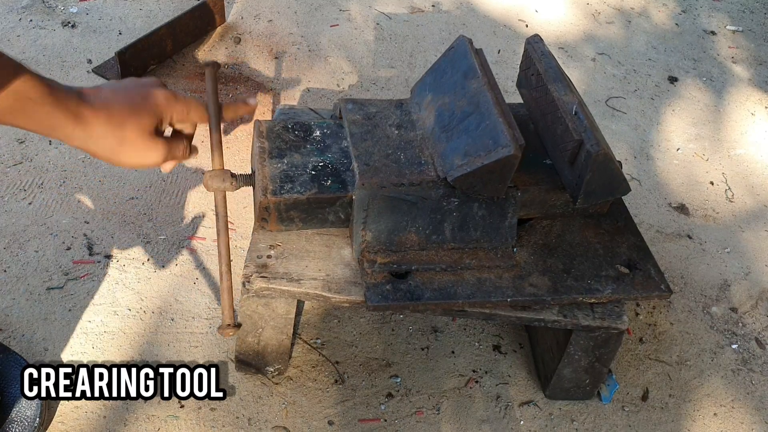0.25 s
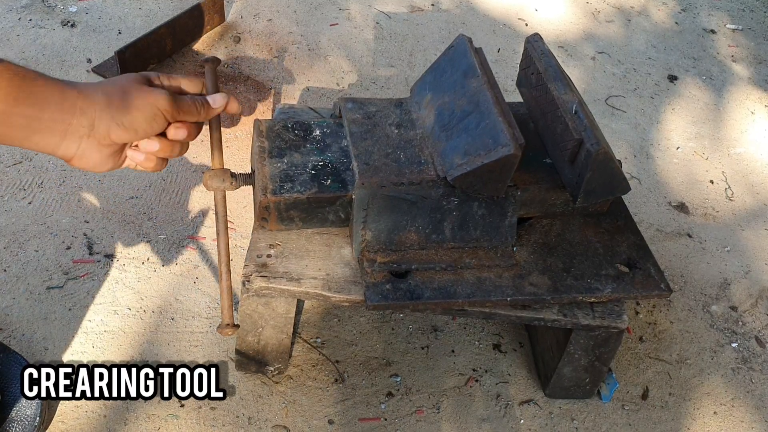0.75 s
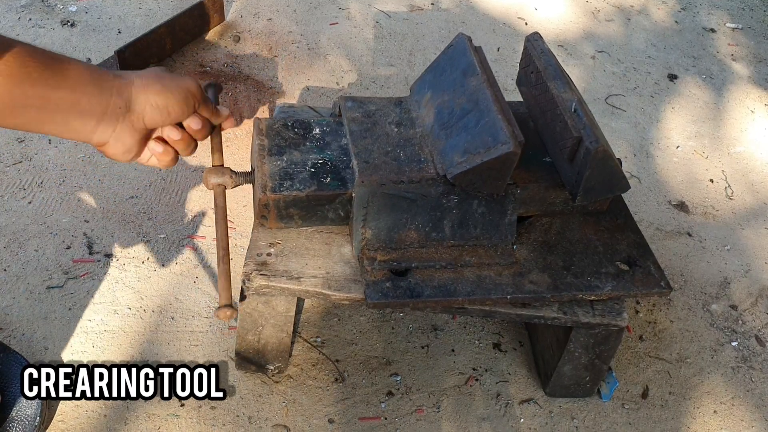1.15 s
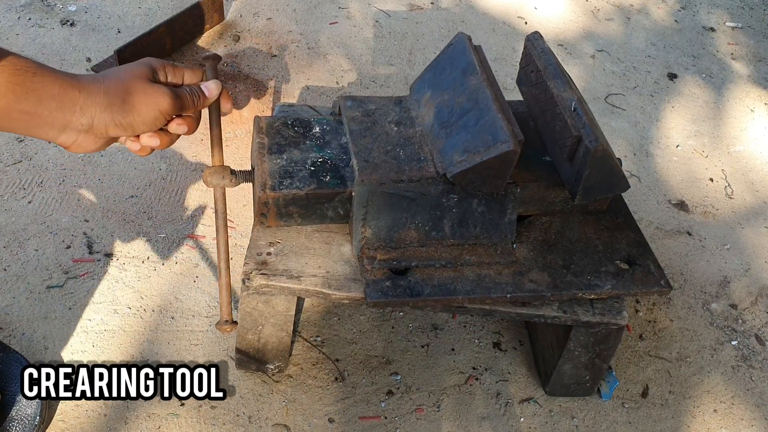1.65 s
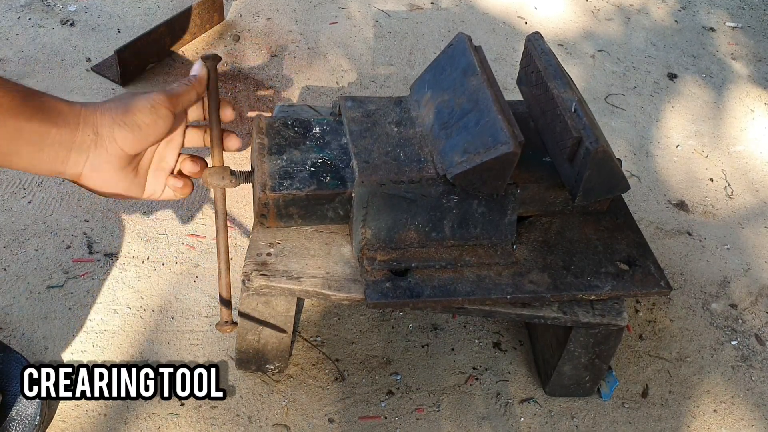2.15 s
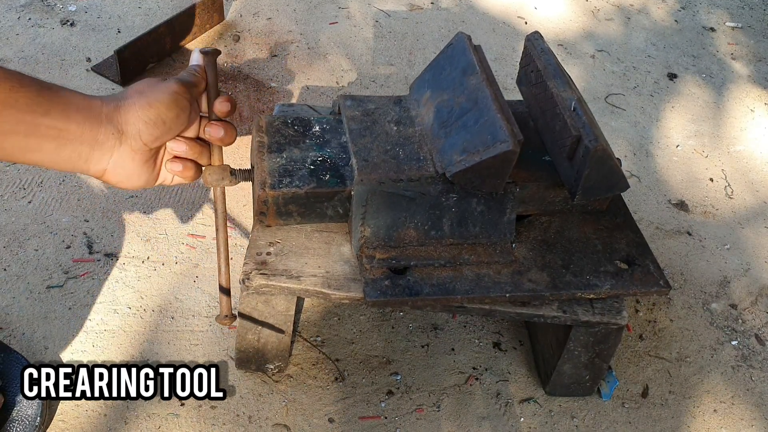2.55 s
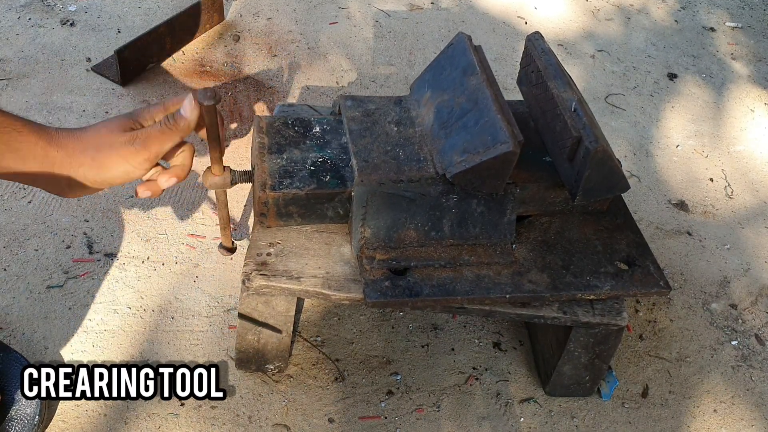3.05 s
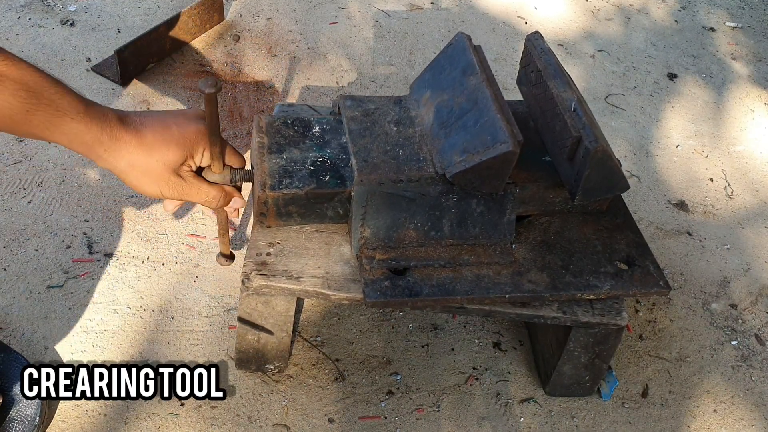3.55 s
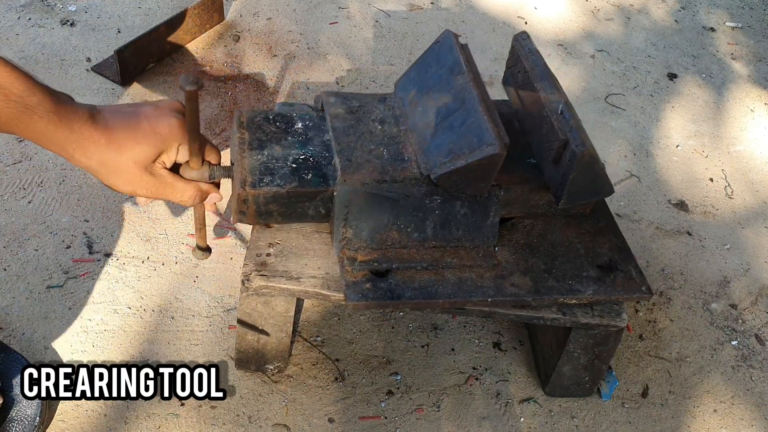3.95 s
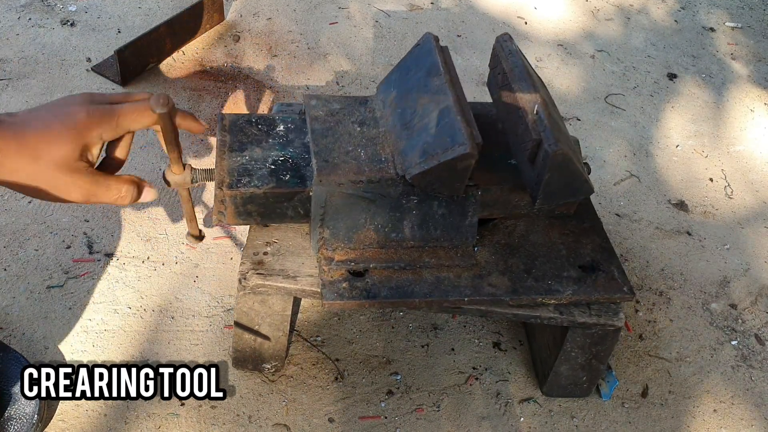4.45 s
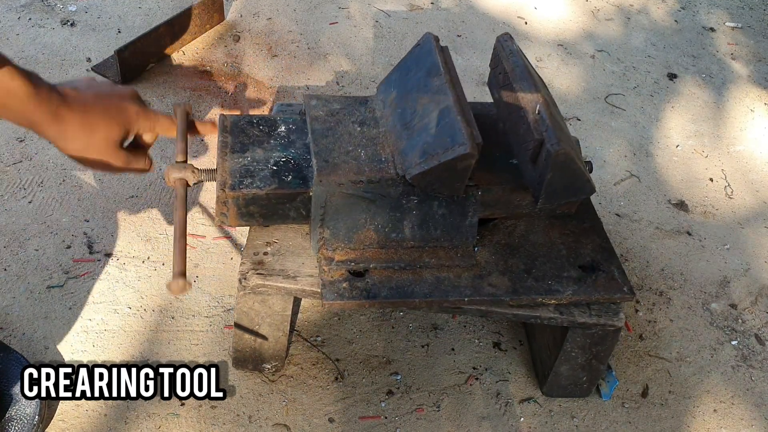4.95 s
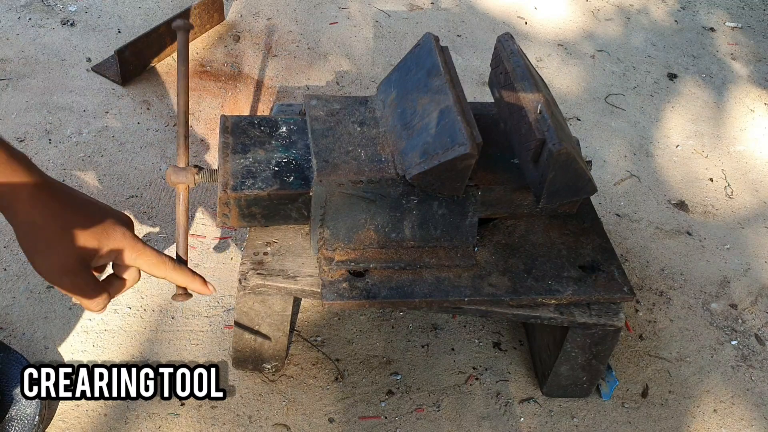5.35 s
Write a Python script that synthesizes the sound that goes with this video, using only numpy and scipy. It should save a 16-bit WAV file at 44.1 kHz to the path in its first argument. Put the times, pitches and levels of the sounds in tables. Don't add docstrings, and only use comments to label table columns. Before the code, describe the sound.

A hand works the loose rod of a heavy metal vise on sandy ground. Hard, quickly damped clanks alternate with gritty scraping and dry skin hiss. Most contacts are faint; one blow near four seconds dominates with rapid rebounds. The microphones are close, slightly nearer on the left, with short yard reflections, low traffic rumble, sparse distant chirps and a thin insect hiss.

```python
import sys
import numpy as np
from scipy import signal
from scipy.fft import rfft, irfft
from scipy.io import wavfile
from scipy.ndimage import uniform_filter1d

SR = 44100
rng = np.random.default_rng(int(sys.argv[2]) if len(sys.argv) > 2 else 0)


def attenuation_scalar(level_db):
    decades = np.asarray(level_db, float) / 20
    return 10 ** decades


def master(y):
    cut = np.clip(np.atleast_2d(y).T, -1, 1)
    pcm = np.round(cut * 32767)
    wavfile.write(sys.argv[1], SR, pcm.astype(np.int16))


N = 246519


def evened(x):
    return x / np.sqrt(np.mean(x ** 2) + 1e-20)


def read(points, hz):
    f, value = np.transpose(points)
    return np.interp(np.log(hz + 1), np.log(f + 1), value)


def add(mix, s, sound):
    part = mix[..., max(round(s * SR), 0):][..., :sound.shape[-1]]
    part += sound[..., :part.shape[-1]]


def coloured(x, points):
    gain = attenuation_scalar(read(points, np.fft.rfftfreq(N, 1 / SR)))
    return evened(irfft(rfft(x) * gain, N))


def resonate(x, hz, width):
    turn = np.exp(2j * np.pi * np.cumsum(hz * np.ones(x.shape[-1])) / SR)
    r = np.exp(-np.pi * width / SR)
    low = x / turn
    for _ in range(2):
        low = signal.lfilter([1 - r], [1, -r], low)
    return 2 * (turn * low).real


def swell(peak_s, rise_s, fall_s, db):
    t = np.arange(N) / SR - peak_s
    swing_db = 19.5
    return attenuation_scalar(db - swing_db * np.where(t < 0, -t / rise_s, t / fall_s))


def knock(modes, row):
    s, clank_db, weight_db, hard_db, grip = row
    ring_db = clank_db + hard_db
    hz, db, t60 = np.transpose(modes)[:, :, None]
    t = np.arange(7000 if clank_db > -33 else 4000) / SR
    coarse = t[::40]
    spot_luck, pitch_luck = rng.standard_normal((2, len(modes), 1))
    a, b, c, d = rng.standard_normal((4, len(modes), len(coarse)))

    beats = 2 * uniform_filter1d(a + 1j * b, size=6) * (1 - np.exp(-coarse / 0.0025))
    chatter = (c + 1j * d) * np.exp(-coarse / 0.0076) * np.minimum(hz / 2600, 1) ** 2.2
    wobble = 1 + signal.resample((0.45 + hz / 8000) * beats + 1.5 * chatter, len(t), axis=1)

    decay_db = -60 * t / (np.clip(t60, .015, .4) * grip)
    speed = np.sqrt(hz / 1500) * attenuation_scalar(0.077 * (clank_db + 18.5))
    rise = (1 - np.exp(-t / 0.0014 * speed)) ** 2
    spin = np.exp(2j * np.pi * hz * (1 + 0.0018 * pitch_luck) * t)
    rings = attenuation_scalar(db + 2.5 * spot_luck + decay_db) * rise * (wobble * spin).imag

    tick_band = signal.butter(3, [5400, 9800], "bandpass", fs=SR)
    tick = signal.lfilter(*tick_band, rng.standard_normal(len(t))) * rise[-1] * np.exp(-t / 0.009)
    out = attenuation_scalar(-19 + 0.81 * ring_db) * tick
    rattle_band = signal.butter(2, [700, 6200], "bandpass", fs=SR)
    rattle = signal.lfilter(*rattle_band, rng.standard_normal(len(t))) * rise[-1] * np.exp(-t / 0.03)
    out += attenuation_scalar(-17.5 + clank_db + .5 * hard_db) * rattle

    group = np.digitize(hz[:, 0], [870, 2300])
    for k, level_db in enumerate([clank_db + weight_db + 3.0, clank_db + 2.0, ring_db + 4.0]):
        part = rings[group == k].sum(0)
        out += attenuation_scalar(level_db) * part / abs(part).max()
    return s - .0018, out * signal.windows.tukey(2 * len(t), .2)[len(t):]


# (frequency [Hz], level [dB], t60 [s])
ROD_MODES = [(300, -12.5, 0.11), (384, -7.5, 0.14), (518, -3.5, 0.087), (637, -14, 0.23), (930, -22, 0.035),
             (1202, 0, 0.085), (1370, -6, .09), (1410, 1, 0.047), (1546, -9, 0.22), (1665, -2.5, 0.088),
             (1950, -9, 0.13), (2160, -11.5, 0.068), (2475, -5.5, 0.052), (2660, -15.5, 0.063),
             (2770, -12, 0.065), (3132, -31.5, 0.068), (3210, -18.5, 0.1), (3680, -8, 0.036),
             (3867, -14, 0.13), (4050, -18, 0.1), (4380, -17.5, 0.12), (4827, -15, 0.082),
             (5120, -16, 0.045), (6070, -28, 0.034), (6800, -25, 0.018)]
# (frequency [Hz], level [dB], t60 [s])
SCREW_MODES = [(316, 0, 0.25), (421, -13, 0.0596), (512.6, -9, 0.27), (545, -2.5, 0.13), (624, -4.5, 0.13),
               (686.6, 5.5, 0.17), (1230, 1, 0.057), (1325, -3.5, 0.12), (1345, 2, 0.032), (1492, 2, 0.062),
               (1614, -12.5, 0.17), (1750, -5, 0.07), (2061, -9, 0.11), (2090, -34, 0.054),
               (2656, -51.5, 0.3), (2620, 4.5, 0.04), (2700, -14, 0.13), (3110, -4, 0.11), (3193, -7, 0.1),
               (3854, -4, 0.1), (4170, -19, 0.082), (3994, -5, 0.07), (4150, -6, 0.045), (4860, -14, 0.08),
               (4970, -43, 0.09), (6230, -36.5, 0.11)]
# (frequency [Hz], level [dB], t60 [s])
BODY_MODES = [(315, -10.5, 0.33), (335.3, -10.5, 0.66), (400, -7, 0.3), (449.7, 13, 0.094),
              (540, -5.5, 0.13), (589.3, 13, 0.13), (670, 1.5, 0.14), (669, -5, 0.21), (808, -13, 0.27),
              (960, -11.5, 0.074), (1140, 2, 0.11), (1220, -5.5, 0.14), (1340, -10, 0.057),
              (1410, -7.5, 0.042), (1425, 0, 0.14), (1636, -5, 0.11), (1750, -3, 0.044),
              (1966, -0.5, 0.084), (2000, -3.5, 0.023), (2540, -20.5, 0.2), (2580, -10, 0.066),
              (3000, -20.5, 0.072), (3400, -20.5, 0.19), (3580, -20, 0.18), (4247, -25.5, 0.0993),
              (4330, -29.5, 0.095), (4700, -37, 0.13), (5270, -27.5, 0.02)]
# (frequency [Hz], level [dB], t60 [s])
BLOW_MODES = [(334, -15.5, 0.079), (558.6, -6, .035), (644.6, 0.5, 0.052), (807, -15, .08),
              (1228, -2.5, .04), (1327, -11.5, 0.047), (1500, -13.5, 0.065), (1970, -5, 0.036),
              (2170, -6, .025), (2640, -19.5, 0.03), (3074, -22, .04), (3475, -17.5, .025),
              (3860, -26, .05), (4190, -29, .05), (4840, -39, 0.028)]
# (frequency [Hz], level [dB], t60 [s])
REBOUND_MODES = [(331, -11.5, 0.16), (406, -5.5, .08), (538.3, -9, 0.089), (650, -2.5, 0.038),
                 (803, -11.5, 0.092), (1105, -1.5, 0.11), (1210, -13.5, 0.072), (1333, -15, 0.11),
                 (1547, -5, 0.053), (1876, -18.5, 0.08), (2312, -27, .12), (2730, -22, 0.12),
                 (2850, -25, 0.045), (3530, -31.5, .07), (3680, -25.5, 0.068), (4120, -34, .05),
                 (4856, -40, .1)]
# (frequency [Hz], level [dB], t60 [s])
TIP_MODES = [(512, -2, .15), (600, -6.5, 0.11), (744, -8.5, .1), (1222, -7.5, 0.1), (1456, 7, 0.046),
             (1386, -10.5, .07), (1606, -8, 0.11), (1936, -8, 0.1), (2146, -5.5, 0.057), (2500, -21, 0.12),
             (2790, -7.5, 0.099), (3830, -14.5, 0.048), (4400, -16, 0.064), (4830, -11, 0.059),
             (5370, -16.5, 0.057)]
# (frequency [Hz], level [dB], t60 [s])
SHAFT_MODES = [(300, -15, .08), (416.4, -1.5, 0.087), (525.7, -7.5, 0.063), (653.5, -8, 0.077),
               (954, -19, 0.046), (1165, -3, 0.089), (1300, -9, .08), (1460, 0, 0.036), (1680, -9.5, .06),
               (1912, -9, 0.068), (2230, -15.5, .06), (2440, -9, 0.065), (2717, -9, .06), (3100, -15, .07),
               (3370, -14, .07), (3700, -13.5, 0.055), (3930, -14, 0.08), (4390, -15.5, .07),
               (4700, -20, 0.098), (5150, -24.5, 0.042)]
# (frequency [Hz], level [dB], t60 [s])
COLLAR_MODES = [(316, -4.5, 0.055), (479, -2, 0.034), (704, 0, 0.044), (1020, -11, .03),
                (1178, -0.5, 0.052), (1337, 0, 0.032), (1590, -9, 0.045), (1944, -10, 0.047),
                (2310, -14, 0.046), (2530, -18, 0.053), (3150, -25, .05), (3760, -20, .05)]
# (time [s], clank peak [dB], weight [dB], hardness [dB], grip [factor])
ROD_KNOCKS = [(0.029, -55.5, -12, 5, 0.79), (0.1867, -56, -21, 2, 1), (0.4722, -50, -3, -1, 1),
              (0.6415, -40, -3, 4.5, 1), (0.8794, -39, -13, -2.5, 0.84), (0.93, -41, -6, -16, 0.44),
              (0.9579, -41, -10.5, -10.5, 1), (0.9947, -44.5, -1.5, -2.5, 1), (1.294, -43.5, 5.5, -16, 0.9),
              (1.417, -41.5, -2, -1.5, 0.71), (2.614, -47.5, -3.5, -6.5, 0.5),
              (2.773, -54.5, -25, -2.5, 0.88), (2.86, -63.5, 3, -5, 0.98), (3.1457, -55.5, -8.5, -10, 0.88),
              (3.2, -50, -13, -11, 0.92), (3.403, -62.5, -3, 1.5, 1), (3.425, -54, 4, 1, 1)]
# (time [s], clank peak [dB], weight [dB], hardness [dB], grip [factor])
SCREW_KNOCKS = [(0.279, -33, 6.5, -3, 0.62), (0.281, -24, -6, 3, 0.6), (0.2868, -31.5, -5.5, 1.5, 0.5),
                (0.2938, -25.5, -13, -11, 0.6), (4.493, -56, -27, -9, 0.63),
                (4.6317, -53.5, -12, -23.5, 0.99), (4.8685, -48, -2, -6.5, 0.46),
                (5.2783, -54, -7.5, -24, 1), (5.338, -56, -18, -15, .9), (5.4231, -57, -7, 0.5, 0.68),
                (5.5237, -55.5, 5, -3, 1)]
# (time [s], clank peak [dB], weight [dB], hardness [dB], grip [factor])
BODY_KNOCKS = [
    (3.983, -49, 7.5, -10, 0.64),
    (3.9895, -36, -4, -3, .3),
    (4.072, -19.5, -0.5, -15, 0.29),
    (4.090, -36.5, 4, -18, 0.66),
    (4.24, -43, 3.5, -12.5, 0.82),
    (4.333, -59.5, 6, -8, 0.97),
    (4.43, -60, -7, -14, 0.64),
    (4.437, -48, 0.5, -13, 0.58),
    (4.46, -55, -4, -4, 0.46),
]
# (time [s], clank peak [dB], weight [dB], hardness [dB], grip [factor])
BLOW_KNOCKS = [
    (4.0140, -6, -8, -10, .55),
    (4.032, -24.5, 7, -8.5, 0.61),
]
# (time [s], clank peak [dB], weight [dB], hardness [dB], grip [factor])
REBOUND_KNOCKS = [
    (4.041, -11.5, -2.5, -19.5, 0.57),
    (4.0455, -21, -7.5, -12, 0.62),
    (4.052, -19.5, -6, -11.5, 0.55),
    (4.062, -24.5, -3, -15.5, 0.93),
]
# (time [s], clank peak [dB], weight [dB], hardness [dB], grip [factor])
TIP_KNOCKS = [
    (3.4665, -23.5, -11, -8, 0.75),
    (3.5, -46, -4, -4, 0.61),
]
# (time [s], clank peak [dB], weight [dB], hardness [dB], grip [factor])
SHAFT_KNOCKS = [
    (0.7209, -26.5, -8, 3.5, 0.55),
    (0.7223, -14.5, -8, -4.5, 0.97),
    (.74, -32.5, -2, -4, 0.9),
]
# (time [s], clank peak [dB], weight [dB], hardness [dB], grip [factor])
COLLAR_KNOCKS = [
    (1.2533, -44, 3, -11, 0.25),
    (1.257, -27.5, -2.5, -17.5, 0.74),
    (1.302, -44.5, 3.5, -11, 1.1),
]


def vise_knocks():
    out = np.zeros(N)
    for modes, knocks in ((ROD_MODES, ROD_KNOCKS), (SCREW_MODES, SCREW_KNOCKS), (BODY_MODES, BODY_KNOCKS),
                          (BLOW_MODES, BLOW_KNOCKS), (REBOUND_MODES, REBOUND_KNOCKS), (TIP_MODES, TIP_KNOCKS),
                          (SHAFT_MODES, SHAFT_KNOCKS), (COLLAR_MODES, COLLAR_KNOCKS)):
        for row in knocks:
            add(out, *knock(modes, row))
    return out


# (time [s], frequency [Hz], level [dB],
# t60 [s])
SINGING_MODES = [(.284, 3130, -40, .05), (4.0065, 450, -9.5, .04), (4.0095, 577, -5.5, 0.049),
                 (4.0405, 1545, -20, 0.098), (4.0405, 640, -16, 0.036), (4.012, 230, -24.5, 0.12),
                 (2.615, 2450, -57, 0.055), (3.466, 3890, -37.5, .04), (.281, 1200, -35, 0.065),
                 (.281, 410, -34, .08), (3.4215, 1276, -48.5, 0.13), (5.1, 1490, -50, .04),
                 (1.258, 2450, -50, .05), (3.2, 1300, -52, 0.044), (4.071, 1900, -27.5, .04),
                 (.7205, 9700, -40, 0.04), (1.262, 1120, -41, 0.14), (1.29, 1596, -49, 0.097),
                 (1.417, 2430, -51, 0.15), (1.417, 2500, -59, 0.17), (1.422, 560, -51, 0.12),
                 (2.616, 1170, -51, 0.21), (3.468, 515, -49, .25), (3.468, 5300, -50, 0.073),
                 (4.086, 1120, -36.5, 0.09), (4.06, 1115, -22, .09), (.7205, 1460, -20, 0.024),
                 (0.64, 6000, -44, 0.05), (4.07, 610, -20, 0.056), (4.435, 2700, -58, .03),
                 (4.335, 1800, -61.5, 0.11), (1.256, 2000, -42, .03), (4.241, 1400, -45, .06),
                 (4.464, 1700, -52, .03), (3.466, 5700, -52, .06), (4.0135, 1300, -14, .015),
                 (4.867, 2700, -51.5, 0.036), (4.432, 1530, -58, 0.13), (6.4, 1500, -53, 0.14)]


def singing():
    out, t = np.zeros(N), np.arange(8000) / SR
    for s, hz, db, t60 in SINGING_MODES:
        tone = np.sin(2 * np.pi * hz * t) * (1 - np.exp(-t / 0.001))
        add(out, s, attenuation_scalar(db - 60 * t / t60) * tone)
    return out


# (frequency [Hz], level [dB])
GRIT_SPECTRUM = [(200, -16.5), (350, -7), (550, -5.5), (900, -14), (1400, -6), (2300, -8), (3500, -21.5)]
# (frequency [Hz], level [dB])
RASP_SPECTRUM = [(1800, -24.5), (2800, -6), (3300, -4.5), (3850, 0), (4400, -4.5), (5050, 1.5), (7000, -10),
                 (9000, -18.5)]
# (peak time [s], rise [s], fall [s], scrape level [dB], rasp over scrape [dB])
STROKES = [(.03, 0.18, 0.28, -63.5, -3), (.2, 0.061, 0.16, -69, 4), (.3, 0.047, 0.15, -47.5, -6.5),
           (0.799, 0.12, 0.18, -50.5, -11.5), (1.0, 0.073, 0.048, -63, -6), (1.28, 0.16, 0.1, -55, -16.5),
           (1.48, 0.11, 0.17, -73.5, 1.5), (2.1, 0.49, 1, -73, -12.5), (2.78, 0.047, 0.11, -67.5, -1.5),
           (3.22, 0.14, 0.075, -75.5, -1), (3.46, 0.067, 0.43, -71, 1), (4.031, .17, 0.046, -40.5, -3.5),
           (4.15, 0.088, 0.24, -53, -10), (4.6, 0.25, 0.69, -70.5, -13.5), (4.81, 0.088, 0.24, -64.5, -3.5),
           (5.1, 0.41, 0.57, -69, -10), (5.34, 0.11, 0.16, -67, -1), (5.51, 0.2, 0.28, -55.5, -9.5)]


def rod_scrape():
    clicks = attenuation_scalar(1.2 * np.minimum(rng.exponential(1, N), 4)) * (rng.random(N) < 1500 / SR)
    grit = rng.standard_normal(N) * (.5 + clicks)
    t = np.arange(3000) / SR
    pressed_ring = sum(attenuation_scalar(0.26 * db - 60 * t / (0.13 * t60)) * np.sin(2 * np.pi * hz * t)
                       for hz, db, t60 in ROD_MODES)
    steel = evened(signal.oaconvolve(grit, pressed_ring)[:N])
    strokes = np.array([swell(*row[:4]) for row in STROKES])
    rasp_gain = attenuation_scalar(np.transpose(STROKES)[4])
    scrape = coloured(steel + 0.23 * evened(grit), GRIT_SPECTRUM) * (attenuation_scalar(-93.5) + attenuation_scalar(-2.5) * strokes.sum(0))
    rasp = coloured(steel + 1.6 * evened(grit), RASP_SPECTRUM) * (attenuation_scalar(-95) + rasp_gain @ strokes)
    return scrape + rasp


# (frequency [Hz], level [dB])
SKIN_SPECTRUM = [(5000, -19.5), (7500, -6.5), (9000, 2), (12000, -1.5), (15000, -3), (17000, -4)]
# (peak time [s], rise [s], fall [s], hiss level [dB])
RUBS = [(.03, .05, 0.14, -71.5), (.2, 0.042, 0.16, -68), (.282, .005, 0.14, -65), (.724, .004, 0.057, -54),
        (1.0, 0.12, 0.23, -82), (1.27, .2, 0.2, -69.5), (2.785, .04, 0.17, -71), (3.21, 0.091, .2, -81.5),
        (3.428, 0.013, 0.16, -65), (4.02, 0.14, 0.061, -51.5), (4.08, 0.11, 0.08, -54),
        (4.36, 0.11, 0.07, -69.5), (4.8, .15, 0.19, -75), (5.0, 0.2, 0.12, -74.5), (5.51, 0.14, 0.11, -69)]
# (time [s], peak level [dB])
SNAPS = [
    (2.7719, -59.5),
    (2.9148, -60),
    (3.1981, -60),
    (3.4007, -62),
    (3.426, -56),
    (3.913, -50),
    (4.0305, -29),
    (4.4912, -58),
    (4.8053, -56),
]


def skin_hiss():
    level = attenuation_scalar(-85) + attenuation_scalar(4.5) * sum(swell(*row) for row in RUBS)
    t = np.arange(3000) / SR
    for s, db in SNAPS:
        add(level, s - .001, attenuation_scalar(db + 1.0) * np.exp(-t / 0.003))
    return level * np.array([coloured(v, SKIN_SPECTRUM) for v in rng.standard_normal((2, N))])


def bursts(rows, rise, sag=0):
    out = np.zeros((2, N))
    for s, length, hz, width, db in rows:
        u = np.arange(round(1.6 * length * SR)) / SR / length
        noise = rng.standard_normal((2, len(u)))
        band = evened(resonate(noise, hz * (1 - sag * np.minimum(u, 1)), width))
        add(out, s, attenuation_scalar(db) * band * np.minimum(u / rise, 1) * np.exp(-1.6 * u ** 2))
    return out


# (time [s], length [s], frequency [Hz], width [Hz], level [dB])
SCUFFS = [(1.14, 0.24, 4810, 1420, -61), (1.16, 0.17, 1860, 1210, -57.5), (1.96, .26, 3210, 60, -72.5),
          (2.069, 0.1, 2440, 300, -60.5), (2.41, 0.1, 470, 400, -53.5), (2.42, 0.068, 1750, 900, -64),
          (3.421, 0.034, 1266, 50.6, -40.5), (3.423, 0.038, 2770, 100, -51.5), (3.653, 0.1, 1760, 300, -62),
          (4.33, 0.07, 6420, 500, -68), (3.28, 0.043, 1300, 500, -61.5), (1.97, 0.077, 400, 80, -57)]
# (time [s], length [s], frequency [Hz], width
# [Hz], level [dB])
GLINTS = [
    (1.26, .05, 2300, 900, -57),
    (4.087, .025, 1200, 900, -40.5),
    (.29, .045, 2700, 900, -50.5),
    (3.42, .014, 14500, 3000, -52),
    (3.775, 0.033, 2060, 200, -59),
    (3.99, .006, 9500, 1500, -52),
    (4.7, 0.028, 3980, 400, -65),
    (.7195, .012, 8600, 1500, -44),
]


def scuffs():
    return bursts(SCUFFS, 0.19) + bursts(GLINTS, 0.19)


# (frequency [Hz], lead [rad])
PORT_LEAD = [(300, -.1), (1200, -0.22), (2500, -1.17), (4000, -2), (6000, -1.79), (9000, -1.64)]


def ports(x):
    lead = read(PORT_LEAD, np.fft.rfftfreq(N, 1 / SR))
    right = irfft(rfft(x) * np.exp(-1j * lead), N)
    return np.array([attenuation_scalar(2.0) * x, attenuation_scalar(-2.0) * right])


# (frequency [Hz], t60 [s])
ECHO_T60 = [(200, .35), (600, 0.25), (1500, .25), (4000, 0.23), (10000, 0.12)]


def surroundings(x):
    taps = np.zeros((2, SR // 2))
    slots = np.arange(120, SR // 2 - 20, 20)
    at = slots + rng.integers(0, 20, (2, len(slots)))
    np.put_along_axis(taps, at, rng.choice([-1., 1.], at.shape), 1)
    hz, t, z = signal.stft(taps, SR, nperseg=256)
    decay_db = -60 * t / read(ECHO_T60, hz)[:, None]
    tail = signal.istft(z * attenuation_scalar(decay_db), SR, nperseg=256)[1]
    tail /= np.linalg.norm(tail, axis=1, keepdims=True)
    return signal.fftconvolve(x[None], tail, axes=1)[:, :N]


def ground_jolt():
    out = np.zeros(N)
    t = np.arange(SR // 4) / SR
    add(out, 4.015, attenuation_scalar(-30) * np.exp(-t / 0.024) * np.sin(2 * np.pi * 95 * t))
    return out


# (time [s], length [s], start frequency [Hz], width [Hz], level [dB])
CHIRPS = [(.451, 0.1, 5500, 300, -65), (1.463, 0.2, 4700, 500, -68.5), (1.539, 0.095, 4150, 400, -62),
          (1.573, .093, 5140, 600, -67), (1.627, 0.19, 4070, 300, -74), (2.097, 0.14, 3180, 501, -62.5),
          (2.123, 0.11, 3570, 203, -64), (2.134, 0.099, 5240, 600, -68), (2.992, 0.12, 5360, 593, -68),
          (3.185, 0.1, 3100, 198, -66.5), (3.575, 0.15, 4950, 503, -67), (3.639, 0.14, 4110, 500, -65),
          (3.779, 0.13, 1750, 205, -60), (3.808, 0.19, 2890, 199, -61.5), (4.327, 0.067, 3000, 600, -62.5)]


def birds():
    return bursts(CHIRPS, 0.056, sag=.06)


def traffic():
    a, b, c, d, e = rng.standard_normal((5, N))
    hum = attenuation_scalar(-53.5) * evened(resonate(a, 54, 11.0))
    murmur = attenuation_scalar(-52.5) * evened(resonate(b, 72, 43))
    road = attenuation_scalar(-64.5) * evened(resonate(c, 210, 130))
    firing_hz = 81.94
    engine = evened(resonate(d, firing_hz, 18)) + attenuation_scalar(-17) * evened(resonate(e, 2 * firing_hz, 6.5))
    return (hum + murmur + road) * swell(3.5, 100, 7.2, 0.97) + swell(4, 2, 1.5, -47.5) * engine


# (frequency [Hz], level [dB per Hz])
YARD_SPECTRUM = [(20, -63.5), (32, -33), (45, -10.5), (70, -1.5), (120, -12), (190, -17.5), (400, -31.5),
                 (850, -31.5), (1200, -37), (1600, -47), (2500, -54.5), (4200, -48.5), (6300, -56),
                 (11000, -54), (16000, -58.5)]
# (frequency [Hz], left-right likeness [0-1])
LIKENESS = [(60, .96), (180, 0.59), (400, 0.6), (900, 0.073), (15000, .05)]


def yard_wash():
    frames, hz = N // 512 + 5, np.fft.rfftfreq(2048, 1 / SR)
    a, b, c, d, patches = rng.standard_normal((frames, 1025, 5)).T
    patches = evened(uniform_filter1d(uniform_filter1d(patches, 12, 0), 8, 1))
    same = read(LIKENESS, hz)[:, None]
    left = a + 1j * b
    right = same * left + np.sqrt(1 - same ** 2) * (c + 1j * d)
    z = np.array([left, right]) * attenuation_scalar(read(YARD_SPECTRUM, hz)[:, None] + 4.8 * patches)
    return attenuation_scalar(-52) * evened(signal.istft(z, nperseg=2048, noverlap=1536)[1][:, :N])


# (frequency [Hz], level [dB])
INSECT_SPECTRUM = [(7800, -34), (8600, -9), (9300, -2.5), (10000, -10), (10600, -17), (11500, -19.5),
                   (12100, -38)]


def insects():
    left, right, shared = rng.standard_normal((3, N))
    return attenuation_scalar(-71) * np.array([coloured(v + .5 * shared, INSECT_SPECTRUM) for v in (left, right)])


def scene():
    vise = vise_knocks() + singing() + rod_scrape()
    small_body = signal.butter(3, 240, "highpass", fs=SR, output="sos")
    vise = signal.sosfilt(small_body, vise)
    near = ports(vise) + attenuation_scalar(-10.0) * surroundings(vise) + skin_hiss() + scuffs()
    low = (yard_wash() + traffic() + ground_jolt()) * attenuation_scalar([[.4], [-.4]])
    return near + birds() + low + insects()


def low_pass(x):
    return signal.sosfilt(signal.butter(12, 16460, fs=SR, output="sos"), x)


def record(dry):
    overloaded = 1.272 * np.tanh(dry / 1.335)
    band_limit = signal.firwin(1023, 15800, window="blackman", fs=SR)
    mix = signal.oaconvolve(overloaded, band_limit[None], "same")
    return low_pass(mix)


dry = scene()
out = record(dry)
master(out)
```